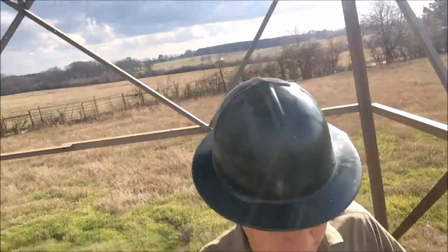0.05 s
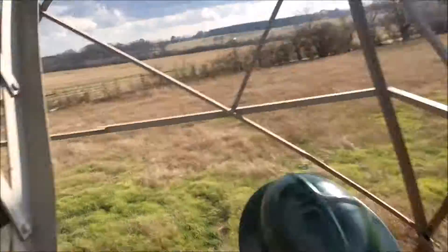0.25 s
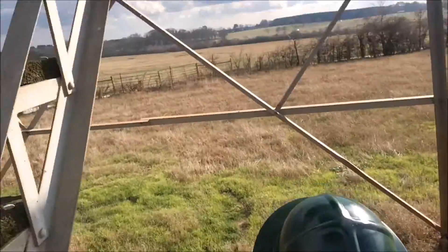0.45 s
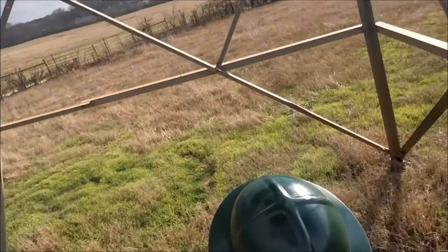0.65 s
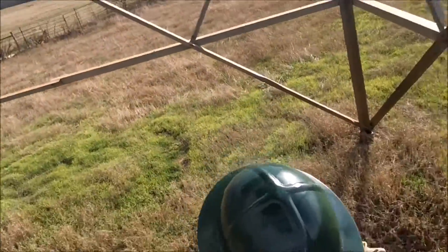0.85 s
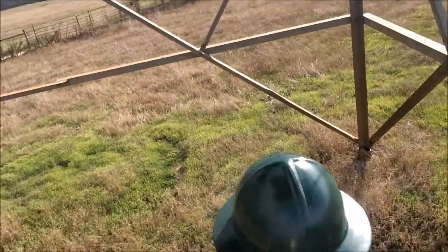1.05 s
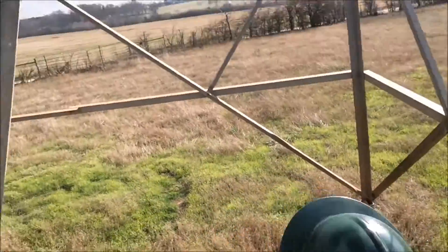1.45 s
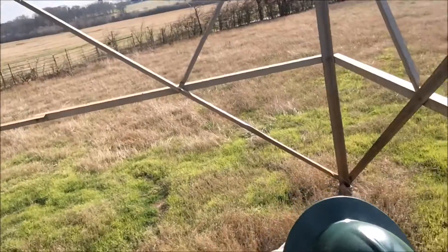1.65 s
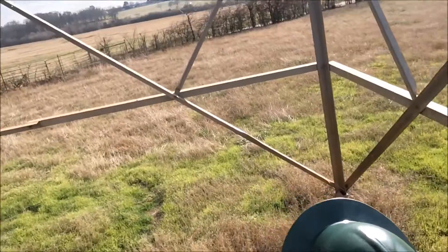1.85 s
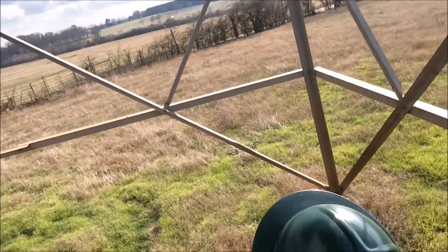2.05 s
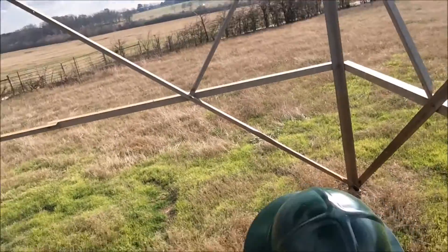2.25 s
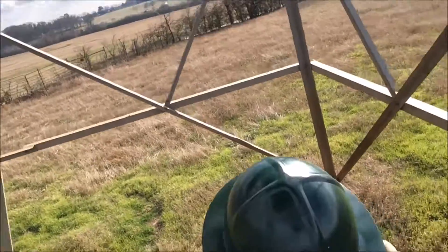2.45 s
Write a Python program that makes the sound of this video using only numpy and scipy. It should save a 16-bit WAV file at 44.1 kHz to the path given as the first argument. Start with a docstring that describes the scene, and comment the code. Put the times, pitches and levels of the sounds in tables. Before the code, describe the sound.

Someone climbs a steel tower with close knocks and clanks. A scuff at 0.2 seconds leads into a loud knock and a brief rail rattle at 0.3. A bright clank comes at 0.6, then dull knocks at about 0.7, 1.3 and 2.2 seconds, with soft thumps and small ticks between. Throughout, clothes rustle faintly and light wind blows in distant trees and on the microphone.

```python
"""Someone climbs a steel lattice tower in an open field, close by.
First comes a scuff, then a grab that knocks the steel and rattles a loose rail.
A struck brace gives a bright clank, and short, dull knocks of boots and hands follow.
In between, shifting weight thumps softly and small contacts tick.
All along, clothes rustle and faint wind blows in far trees and on the microphone."""
import sys
import numpy as np
from scipy.fft import rfft, irfft, next_fast_len
from scipy.io import wavfile
from scipy.ndimage import uniform_filter1d, map_coordinates

SR = 44100
rng = np.random.default_rng(int(sys.argv[2]) if len(sys.argv) > 2 else 0)


def generate_wav(signal):
    """Clip the signal to [-1, 1] and save it as 16-bit WAV at the path in sys.argv[1]."""
    frames = np.transpose(np.atleast_2d(signal))
    scaled = np.clip(frames, -1, 1) * 32767
    pcm = np.round(scaled).astype(np.int16)
    wavfile.write(sys.argv[1], SR, pcm)


N = 110250
RING_N = 22050  # samples in one hit; a fade time (t60) is the seconds it takes to drop 60 dB


def knocks():
    """Boots and hands strike the steel: a dull blow, a hollow note and a brief ring of the frame."""
    # Each row: start and fade time in seconds, tail and frame levels in dB, hollow note in Hz,
    # its level in dB, then the blow's level in dB at each of bands_hz.
    hits = [(.2868, 0.2, -7, -19, 1207, -26.5, 9.1, 16.6, 24.4, -1, 4, 3.5, -7, -21),
            (0.3053, .06, 8, -25, 724, -27, 21, 6.2, 7.6, 13, 8.4, 7.6, -3, -9.5),
            (0.7419, 0.052, 4, -21.5, 1990, -24, 22, 22.9, 19.9, 16.5, 5.1, 11, -3, -24),
            (1.2769, 0.037, 0, -32.5, 1062, -26, 9.5, 19.8, 4.4, -2, 13, 7.1, -10, -33),
            (2.2107, 0.024, -4.5, -38, 440, -36, 21.2, 17.2, 3, -2, 2.6, 2.7, -21, -30)]
    # The frequencies in Hz at which a blow's tone is set.
    bands_hz = [150, 420, 680, 1000, 1550, 2050, 5000, 11000]
    # The frame's notes. Each row: pitch in Hz, level in dB, fade time in seconds.
    frame_notes = [(240, -19.5, 0.42), (309.6, -5, 0.092), (330, -19, 0.48), (383, -10.5, 0.22),
                   (420, -20, 0.54), (453, -0.5, 0.13), (541, -7, .17), (562, -9.5, 0.3),
                   (715.4, -6.5, 0.098), (766, -7, 0.14), (1062, -22.5, 0.19), (1244, -18.5, 0.25),
                   (1383, -19.5, .18), (1600, -21, 0.065), (1877, -15.5, 0.16)]
    out, rise_s = np.zeros(N), 0.0004
    for s, t60, tail_db, frame_db, hollow_hz, hollow_db, *bands_db in hits:
        bass = [(30, bands_db[0] - 20), (95, bands_db[0] - 25.5)]
        colour = [*bass, *zip(bands_hz, bands_db), (15000, bands_db[-1] - 14)]
        envelope = fade_with_tail(t60, tail_s=0.17, tail_db=tail_db, rise_s=rise_s)
        blow = burst(envelope, colour, push=0.18)
        frame = amp(frame_db) * ring(frame_notes, rise_s)
        hollow = ring([(hollow_hz, hollow_db, 0.073)], rise_s=0.00055)
        add(out, s, blow + frame + hollow)
    return out


def rail_rattle():
    """A loose rail catches and slips in its joint, grinding and ringing."""
    # The grinding's tone. Each row: frequency in Hz, level in dB.
    colour = [(100, 8), (300, 8), (550, 16), (750, 10), (980, 21), (1500, 9.5), (2000, 16), (2500, 12.5),
              (3050, 15), (3900, 6.5), (5400, 3.5), (6100, 9), (7200, 0), (10500, -5.5), (15000, -12.5)]
    # The rail's notes. Each row: pitch in Hz, level in dB, fade time in seconds.
    notes = [(565, -32, 0.29), (894, -22.5, 0.13), (927, -25.5, 0.14), (1081, -26.5, 0.14),
             (1408, -31, 0.19), (1860, -34.5, 0.2), (2200, -35, 0.19), (2860, -31, 0.17),
             (3086, -29.5, 0.13), (5200, -28, 0.11), (5940, -27, 0.092), (6130, -31, .12)]
    out, rise_s = np.zeros(N), 0.004
    grit = amp(wobble(703)[:RING_N])
    chatter = grit * fade_with_tail(0.21, tail_s=0.26, tail_db=-4, rise_s=rise_s)
    add(out, 0.3345, burst(chatter, colour) + ring(notes, rise_s))
    return out


def brace_clank():
    """A struck brace clanks and rings with high notes."""
    # The clank's tone. Each row: frequency in Hz, level in dB.
    colour = [(90, -2), (160, 14), (350, 19.5), (520, 8), (950, 6), (1400, 3.5), (2000, 12), (2900, 11.5),
              (3800, 9), (4400, 3), (5100, 3), (6000, -3), (7200, 0), (9000, -17), (15000, -33)]
    # The brace's notes. Each row: pitch in Hz, level in dB, fade time in seconds.
    notes = [(1860, -33.5, 0.13), (2260, -31.5, 0.11), (2450, -31, 0.16), (2630, -32, .11),
             (2980, -30, 0.13), (3144, -33.5, 0.18), (3170, -32, 0.13), (3640, -30, 0.13),
             (3930, -34, 0.15), (4603, -41, 0.12), (4932, -38, 0.14), (5120, -39, 0.12),
             (5285, -40.5, 0.14), (6850, -35, 0.078), (7260, -30.5, 0.052)]
    out, rise_s = np.zeros(N), 0.0012
    envelope = fade_with_tail(0.1, tail_s=0.26, tail_db=-3, rise_s=rise_s)
    add(out, 0.6328, burst(envelope, colour) + ring(notes, rise_s))
    return out


def thumps():
    """Each shift of the climber's weight sets off a low, slightly unsteady note."""
    # Each row: start in seconds, level in dB, pitch in Hz, fade time in seconds.
    shifts = [(.196, -39, 81, 0.12), (0.2, -23.5, 330, 0.054), (0.217, -29, 390, 0.11),
              (.287, -25, 122.6, 0.14), (0.63, -19, 158, 0.079), (.668, -28, 175, 0.13),
              (.699, -29, 177, 0.081), (0.7407, -16.5, 163.2, 0.12), (0.794, -33, 173.4, 0.29),
              (.945, -34, 57, 0.083), (.995, -39.5, 287, 0.04), (1.057, -36.5, 70, 0.077),
              (1.295, -37, 133, 0.06), (1.426, -34.5, 324, 0.061), (1.4894, -23.5, 173, 0.11),
              (1.701, -31, 101, 0.074), (1.783, -29.5, 107, 0.052), (2.009, -42.5, 149.2, 0.2),
              (2.193, -28.5, 88, 0.074), (2.2095, -24.5, 175, 0.15), (2.261, -25, 185, 0.042),
              (2.425, -36.5, 100, 0.1)]
    out, t = np.zeros(N), np.arange(RING_N) / SR
    for s, db, hz, t60 in shifts:
        phase = 2 * np.pi * hz * t + 0.41 * wobble(91)[:RING_N]
        add(out, s, amp(db) * fade(t60, rise_s=0.0028) * np.sin(phase))
    return out


def ticks():
    """Hard little contacts click without ringing."""
    # Each row: start in seconds, level in dB, frequency in Hz where the treble drops off.
    contacts = [(0.208, -8, 7500), (0.3178, 12, 6400), (0.3234, 16, 5370), (.3308, 5, 7900),
                (0.3952, -5, 7000), (0.439, -9, 9000), (0.478, -8, 7000), (0.4817, -6.5, 7000),
                (0.5266, -11.5, 8300), (0.591, -12, 8100), (0.5947, -16.5, 8000), (0.6241, -4.5, 6900),
                (.7430, 7, 6640), (.853, -16, 7500), (1.2932, -7.5, 5530), (1.3342, -13, 5030),
                (1.4653, -12, 8240), (1.4755, -12, 5900), (1.5418, -13, 7000)]
    # A tick's tone. Each row: frequency in Hz, level in dB.
    tone = [(150, -12), (900, -2.5), (2200, -11), (4000, -7.5), (5800, -8), (9000, -13), (15000, -9)]
    out, hz = np.zeros(N), np.geomspace(50, SR / 2, 40)
    for s, db, edge_hz in contacts:
        treble_cut_db = np.clip(40 * np.log2(hz / edge_hz), 0, 20)
        colour = np.c_[hz, along(tone, hz) - treble_cut_db]
        add(out, s, amp(db) * burst(fade(0.0095, rise_s=0.0001), colour, push=0.5))
    return out


def scuffs():
    """Grainy rubbing swells and dies with each slide over the steel."""
    # Each row: peak time in seconds, level in dB, seconds to rise 30 dB, seconds to fall 60 dB.
    slides = [(0.2194, -25.5, 0.021, 0.033), (0.2068, -33, .06, 0.027), (0.2325, -32, 0.012, 0.09),
              (0.161, -50, 0.055, 0.067), (0.314, -35.5, 0.035, 0.092), (0.506, -54, 0.13, 0.1),
              (2.278, -58, 0.011, 0.045)]
    # The rubbing's tone. Each row: frequency in Hz, level in dB.
    colour = [(100, -17), (200, -4), (340, 0), (560, -9.5), (900, -10.5), (1500, -7.5), (2300, -5),
              (3500, -11), (6300, -10), (7700, -8.5), (8400, -17), (11000, -21.5), (12000, -30),
              (15000, -36)]
    envelope, t = np.zeros(N), np.arange(N) / SR
    for s, db, rise, fall in slides:
        envelope += amp(db - np.maximum(30 * (s - t) / rise, 60 * (t - s) / fall))
    return envelope * uneven_noise(colour, swing_db=1.5, rate=450)


def tree_wind():
    """Wind in far trees makes a soft, drifting rush."""
    # The wind's tone. Each row: frequency in Hz, level in dB.
    colour = [(120, -17), (200, -1.5), (290, -17), (450, 1), (560, -6.5), (900, 1), (1250, -1), (1800, -9),
              (2500, -18), (4500, -31.5), (8000, -48.5), (15000, -53)]
    # Each row: time in seconds, level in dB.
    levels = [(0.0, -51), (0.2, -47.5), (0.35, -44), (1.12, -48), (1.4, -47), (1.91, -49.5), (2.5, -47.5)]
    return amp(curve(levels) + 0.18 * wobble(9.8)) * noise(colour)


def microphone_wind():
    """Puffs of wind hit the microphone and rumble."""
    # The rumble's tone. Each row: frequency in Hz, level in dB.
    colour = [(20, -18), (35, -10), (55, -3), (100, -3), (150, -0.5), (200, -9), (280, -21.5), (600, -57)]
    return amp(-52.5) * uneven_noise(colour, swing_db=2.2, rate=12)


def clothes():
    """The climber's clothes rustle faintly."""
    # The rustle's tone. Each row: frequency in Hz, level in dB.
    colour = [(1000, -8), (2500, 4), (6000, -2), (10000, -9), (15000, -19.5)]
    # Each row: time in seconds, level in dB.
    levels = [(0, -57.5), (.08, -73), (.8, -67), (1.05, -73.5), (1.22, -66), (1.38, -66), (1.46, -60.5),
              (1.58, -72.5), (1.82, -65), (1.97, -61), (2.06, -64.5), (2.18, -55.5), (2.32, -66.5),
              (2.5, -65.5)]
    return amp(curve(levels)) * uneven_noise(colour, swing_db=1.7, rate=200)


def amp(db):
    """Turn decibels into a gain."""
    return 10 ** (np.asarray(db) / 20)


def unit(x):
    """Scale to an average power of 1."""
    return x / np.sqrt(np.mean(x ** 2) + 1e-20)


def along(points, hz):
    """Read between (Hz, value) points on a log frequency scale."""
    f, v = np.transpose(points)
    return np.interp(np.log(hz + 1), np.log(f + 1), v)


def curve(rows):
    """Join (seconds, value) rows with straight lines."""
    return np.interp(np.arange(N) / SR, *np.transpose(rows))


def wobble(rate):
    """A smooth curve through `rate` random points a second."""
    points = rng.standard_normal(int(N * rate / SR) + 4)
    return map_coordinates(points, [np.arange(N) * rate / SR])


def noise(colour):
    """Noise with the tone given by (Hz, dB) rows."""
    m = next_fast_len(N + 8192)
    gain = amp(along(colour, np.fft.rfftfreq(m, 1 / SR)))
    return unit(irfft(rfft(rng.standard_normal(m)) * gain, m)[:N])


def uneven_noise(colour, swing_db, rate):
    """Noise whose level wobbles at random."""
    return unit(noise(colour) * amp(swing_db * wobble(rate)))


def add(out, s, x):
    """Mix x into out, starting at s seconds."""
    part = out[round(s * SR):][:len(x)]
    part += x[:len(part)]


def fade(t60, rise_s):
    """A quick rise, then a smooth dying away."""
    t = np.arange(RING_N) / SR
    return np.exp(-np.log(1000) * t / t60) * (1 - np.exp(-t / rise_s))


def fade_with_tail(t60, tail_s, tail_db, rise_s):
    """Blend two fades; tail_db sets the second against the first."""
    return np.hypot(unit(fade(t60, rise_s)), amp(tail_db) * unit(fade(tail_s, rise_s)))


def ring(notes, rise_s):
    """Fading pure notes, each with a slightly random level and a random sign."""
    out, t = np.zeros(RING_N), np.arange(RING_N) / SR
    for hz, db, t60 in notes:
        envelope = amp(db + rng.normal()) * fade(t60, rise_s)
        out += envelope * np.sin(2 * np.pi * hz * t) * rng.choice([-1, 1])
    return out


def burst(envelope, colour, push=0):
    """A first push plus fading noise, which stands for countless close notes."""
    x = envelope * rng.standard_normal(RING_N)
    x /= np.linalg.norm(x)
    x[0] += push
    spectrum = rfft(x)
    own_tone = np.sqrt(np.abs(uniform_filter1d(np.abs(spectrum) ** 2, size=110)) + 1e-12)
    wanted_tone = amp(along(colour, np.fft.rfftfreq(RING_N, 1 / SR)))
    # Shape the tone so that nothing sounds before the hit (a minimum-phase filter).
    cepstrum = irfft(np.log(wanted_tone / own_tone))
    fold = np.r_[1, np.full(RING_N // 2 - 1, 2), np.zeros(RING_N // 2)]
    return irfft(spectrum * np.exp(rfft(cepstrum * fold)))


def scene():
    """Mix the climb and its background into one channel."""
    climb = knocks() + rail_rattle() + brace_clank() + thumps() + ticks() + scuffs()
    return (climb + tree_wind() + microphone_wind() + clothes())[None]


def record(dry):
    """Cut off the very highest treble."""
    m, top_hz = next_fast_len(N + SR // 2), 15500
    passed = np.fft.rfftfreq(m, 1 / SR) < top_hz
    return irfft(rfft(dry, m) * passed, m)[..., :N]


dry = scene()
out = record(dry)
generate_wav(out)
```